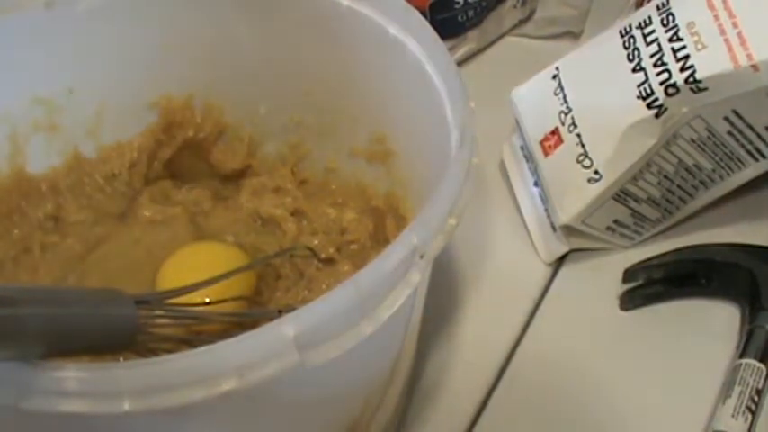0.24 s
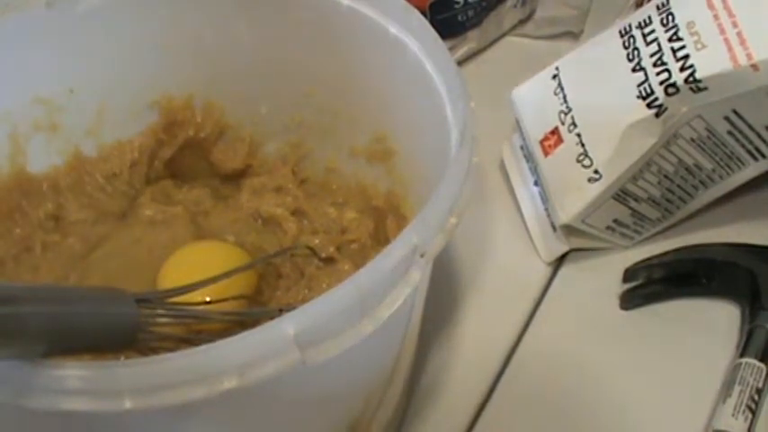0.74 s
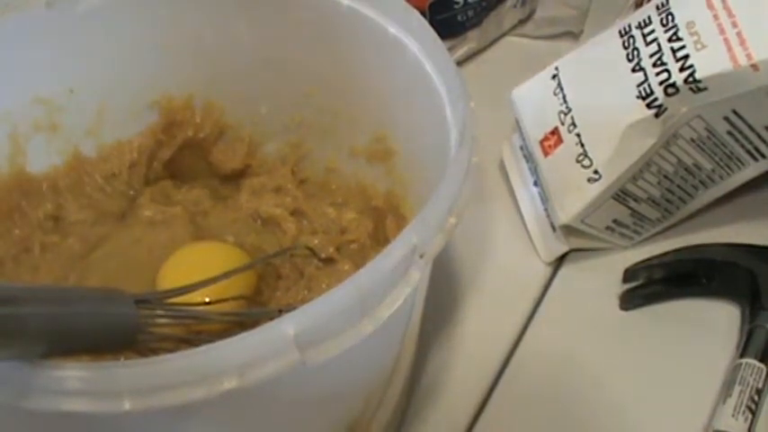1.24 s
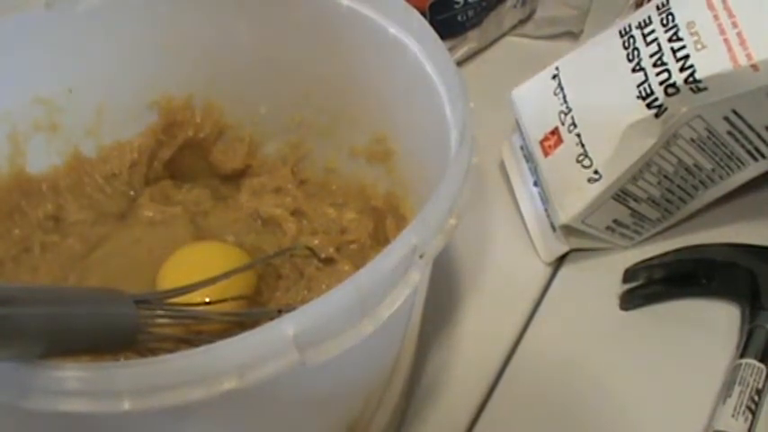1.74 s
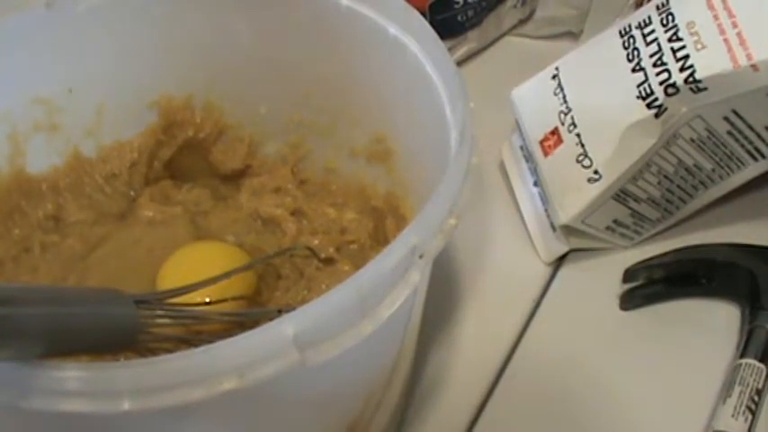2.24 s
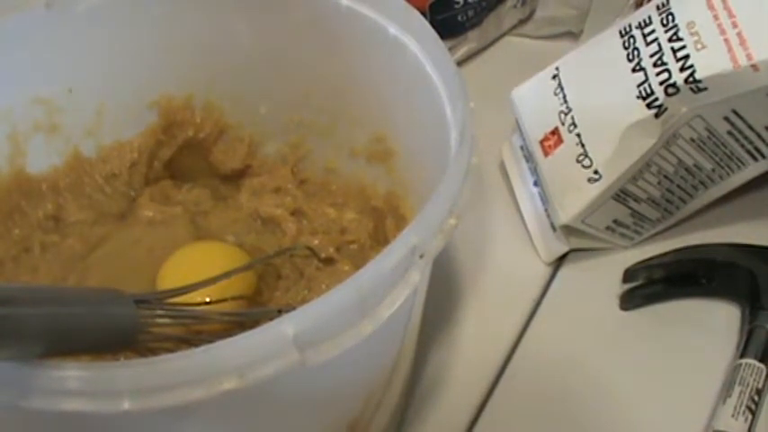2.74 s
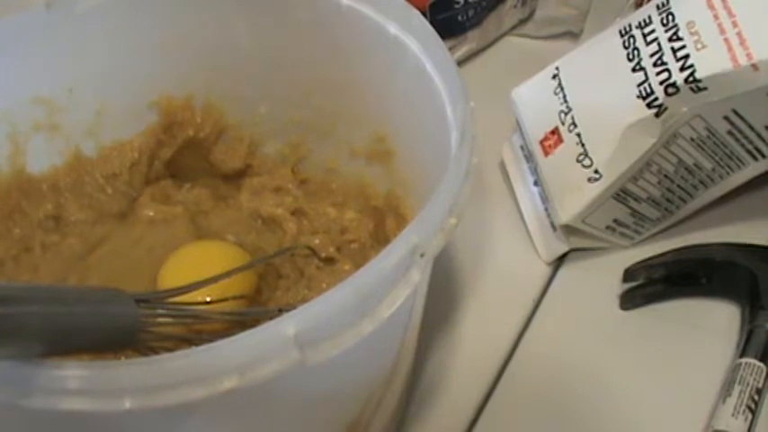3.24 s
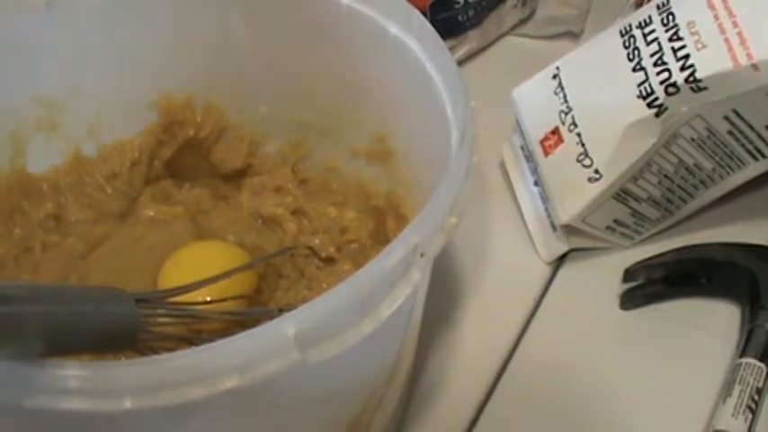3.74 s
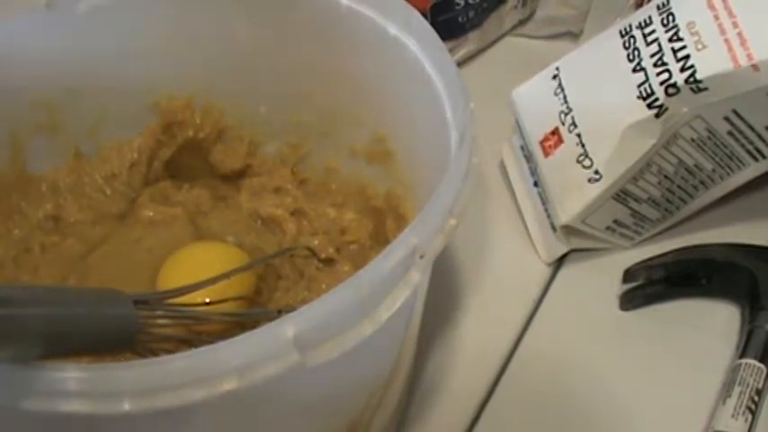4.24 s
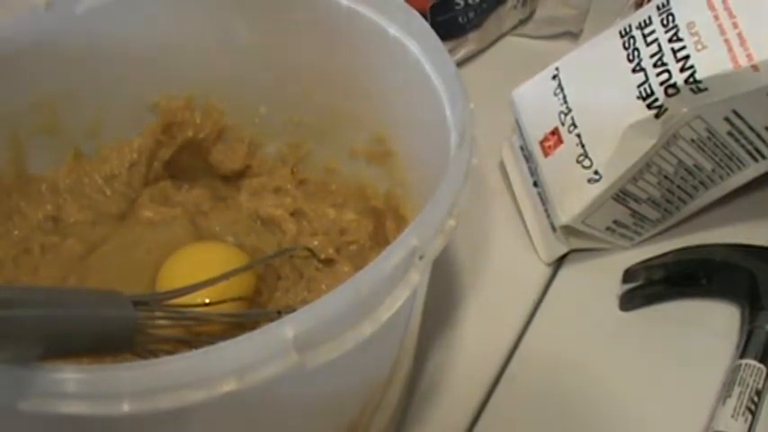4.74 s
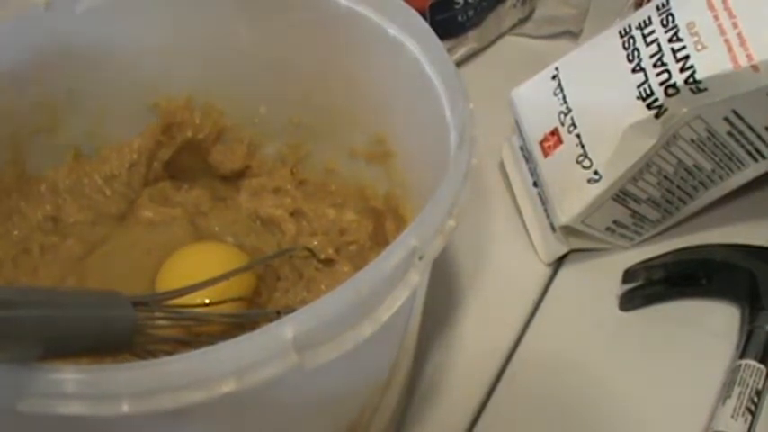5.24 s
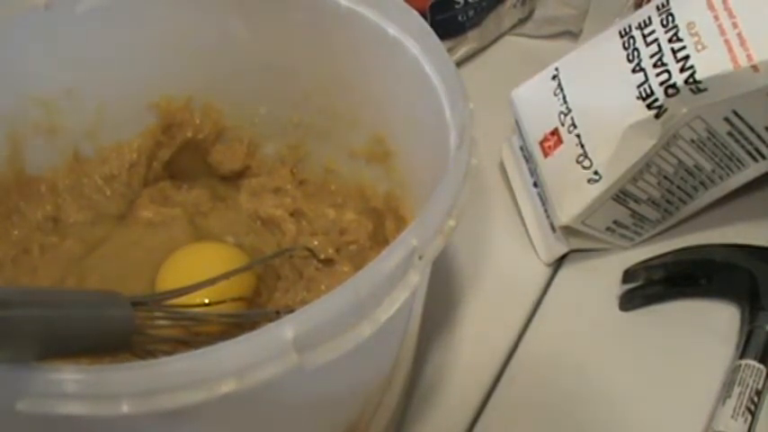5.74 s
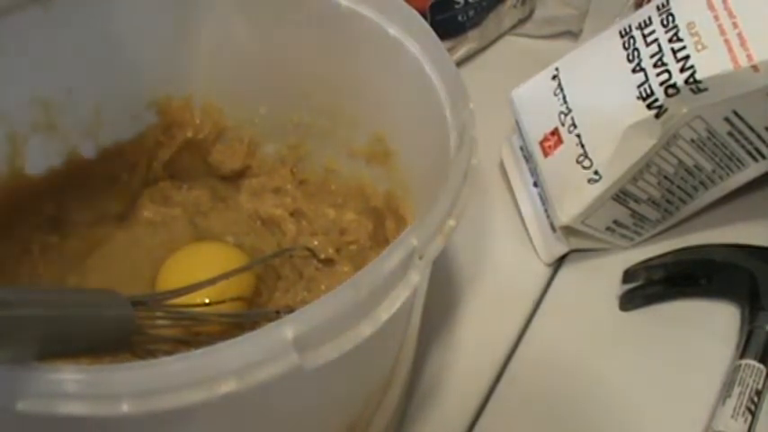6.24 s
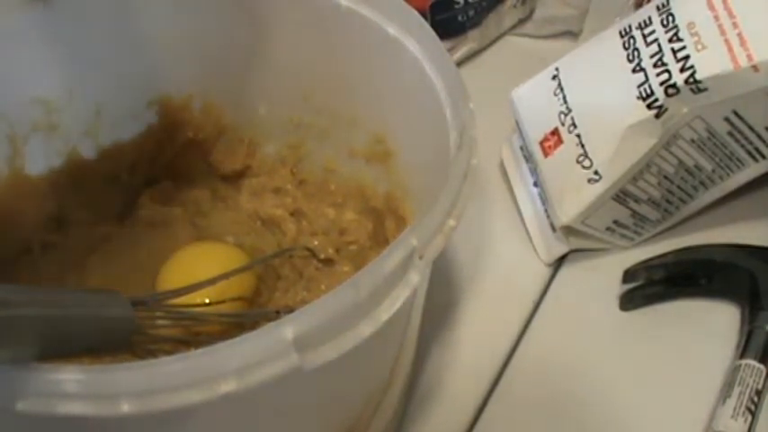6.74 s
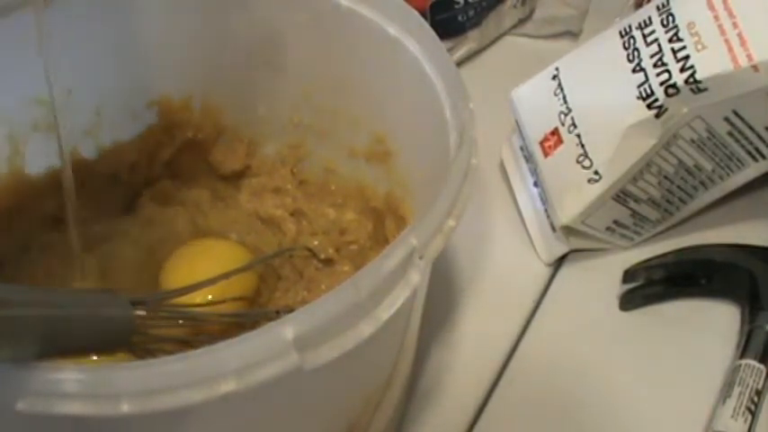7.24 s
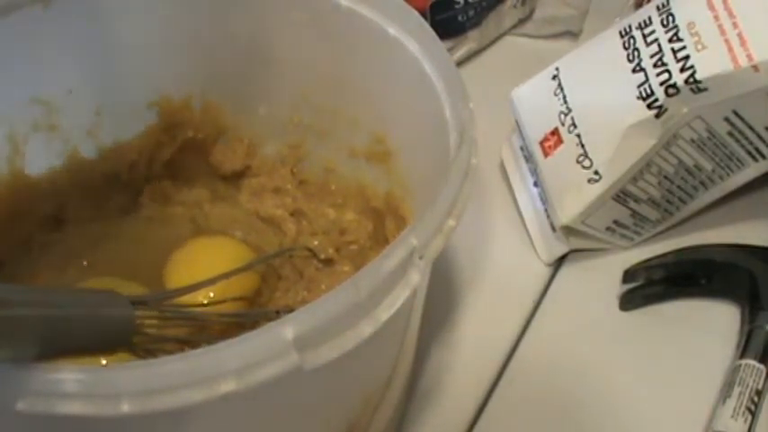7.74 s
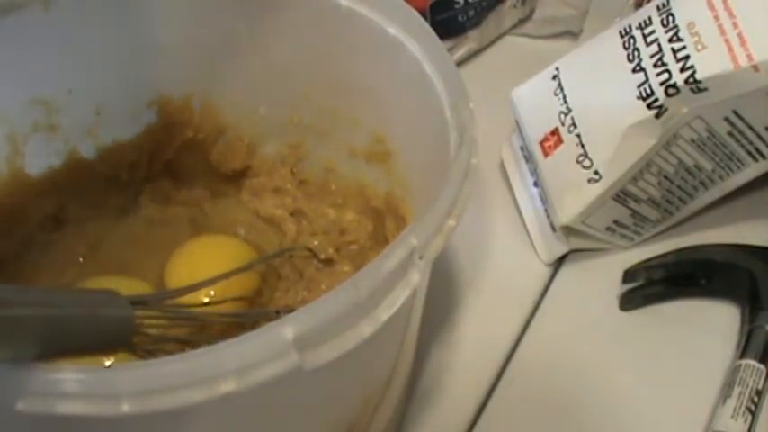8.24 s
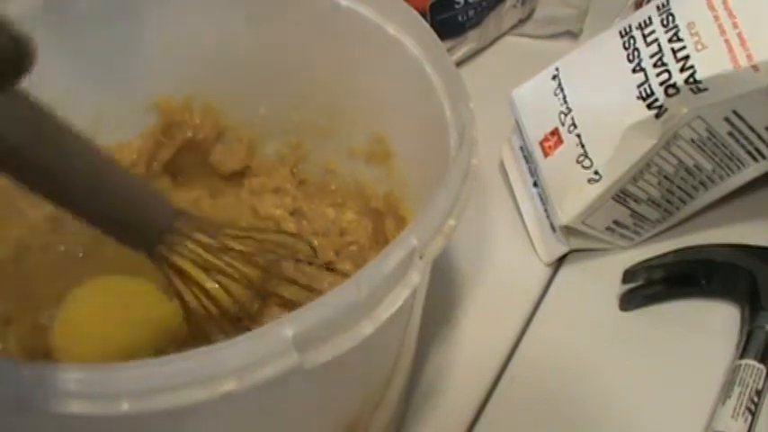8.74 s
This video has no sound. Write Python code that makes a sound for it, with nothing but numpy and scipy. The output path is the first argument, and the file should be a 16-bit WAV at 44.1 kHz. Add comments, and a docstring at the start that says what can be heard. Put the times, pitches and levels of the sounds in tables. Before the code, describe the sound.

Off-screen rummaging and a chattering lid or door clap lead to a crisp egg crack over a plastic bowl, shell crunching and wire whisk taps.

```python
"""Cracking an egg in a quiet kitchen

Out of sight, probably as an egg is fetched, things scrape, click and bump, and something claps shut.
Then, right over a plastic bowl of batter, the shell snaps open, drains with soft plops and is crumpled,
and a wire whisk is lifted. Snaps and scrapes are shaped noise with a resonance; plops and bubbles are
short sine tones. Bowl and room answer most sounds with fading noise, over a steady room murmur.
"""
import sys
import numpy as np
from scipy import signal
from scipy.fft import rfft, irfft
from scipy.io import wavfile

SR = 44100
rng = np.random.default_rng(int(sys.argv[2]) if len(sys.argv) > 2 else 0)


def materialize(psi):
    """Save the field psi as 16-bit PCM at rate SR to the path in sys.argv[1].

    A 1-D psi becomes a single channel; in a 2-D psi each row is a channel.
    """
    bounded = np.clip(np.atleast_2d(psi).T, -1, 1)
    quanta = np.round(bounded * 32767).astype(np.int16)
    wavfile.write(sys.argv[1], SR, quanta)


N = 397295

# Levels in the event tables are relative: each layer is balanced again when it is mixed.
# A t60 is the time a sound takes to fall by 60 dB.

# brittle snaps of the shell: (time [s], level [dB], treble [dB])
SHELL_SNAPS = [(6.1746, -36.5, 3), (6.3367, -36.5, 3), (6.3682, -35, 9), (6.375, -29, 13), (6.386, -18, 4),
               (6.519, -36, 13), (6.5313, -21, 7), (6.536, -18.5, 10), (6.577, -15.5, -1),
               (6.5857, -19.5, 8), (6.6047, -18, 16), (6.6284, -18.5, 7), (6.6969, -26, 6.5),
               (6.757, -27.5, 3), (6.7952, -29, -5), (6.8505, -28.5, 18), (6.8669, -29, -8),
               (6.8846, -30, 8), (6.929, -25.5, -1), (7.0315, -38, 2), (7.1542, -30, -10),
               (7.2316, -38, 3.5), (7.413, -50, -10), (7.9217, -33, -2), (7.9255, -29, -5),
               (7.976, -30.5, 1), (8.0089, -26, -0.5), (8.064, -28.5, -1), (8.0944, -18.5, -4),
               (8.1481, -21.5, 2), (8.1771, -23, -1.5), (8.2096, -28.5, 0), (8.2685, -30.5, 3),
               (8.3027, -28.5, 4.5), (8.3697, -23, 0), (8.4017, -21, 2), (8.4519, -24, -1),
               (8.608, -39.5, 5), (8.681, -36, 15)]
# chips that break free and ring far above the hollow: (time [s], t60 [s], level [dB], pitch [Hz])
SHELL_CHIPS = [(6.4081, 0.036, -21, 6900), (6.716, 0.025, -23, 10500), (6.7385, 0.0054, -17.5, 8100),
               (7.1543, 0.0017, -16.5, 11900), (7.159, 0.0042, -16, 12300)]
# shell crumbling under the thumbs: (time [s], rise [s], t60 [s], level [dB], resonance [Hz])
SHELL_CRUNCHES = [(6.229, 0.034, 0.17, -52, 1000), (6.579, 0.0077, 0.22, -27.5, 1000),
                  (6.691, 0.05, 0.5, -41, 1150), (6.8, 0.06, 0.44, -42.5, 2680),
                  (7.7, 0.15, 0.16, -54, 2580), (7.95, 0.045, 0.3, -43, 2120),
                  (8.094, 0.001, 0.18, -23.5, 3920), (8.14, 0.027, 0.71, -39, 1970),
                  (8.341, 0.041, 0.13, -33.5, 2000), (8.398, 0.028, 0.11, -22.5, 5300),
                  (8.5, 0.15, 2.1, -57, 1860)]
# egg white tearing into tiny bubbles: (start [s], end [s], level [dB])
EGG_WHITE_TEARS = [(6.57, 6.632, -36), (6.695, 6.769, -42), (6.775, 6.873, -30.5), (6.862, 6.944, -31.5),
                   (7.584, 7.921, -45), (8.455, 8.672, -44.5)]
# tone colour of the shell: (frequency [Hz], level [dB])
SHELL_COLOUR = [(60, -13), (250, -7), (500, -2), (900, -0.5), (2500, -1.5), (6000, 0), (11000, -2.5),
                (13000, -7), (16000, -17)]
# faint ticks scattered over this time, and their middle level and range
TICKS_FROM_S, TICKS_TO_S, TICK_DB, TICK_SPREAD_DB = 6.65, 8.7, -44.5, 8
BUBBLE_SPREAD = 2.1  # ratio of the highest to the lowest starting pitch


def eggshell():
    """Brittle shell snaps, chips and crumbles; wet bubbles glide up in pitch as they burst."""
    out = np.zeros(N)
    for s, db, treble_db in SHELL_SNAPS:
        add(out, s, snap(s, db, treble_db))
    for when, strength in rng.random(size=(14, 2)):
        s = TICKS_FROM_S + when * (TICKS_TO_S - TICKS_FROM_S)
        tick_db = TICK_DB + TICK_SPREAD_DB * (strength - .5)
        add(out, s, snap(s, tick_db, treble_db=-10))
    for s, t60, db, hz in SHELL_CHIPS:
        add(out, s, burst(0.00036, t60, db, body_db=-2, treble_db=3, material=SHELL_COLOUR,
                          grain_db=-4.0, hollow_hz=hz, ring_db=9.5))
    for s, rise, t60, db, hz in SHELL_CRUNCHES:
        body_db = hollow(s + rise)[1]
        add(out, s, burst(rise, t60, db, body_db, treble_db=0.0, material=SHELL_COLOUR,
                          grain_db=3.0, hollow_hz=hz, ring_db=4.5))
    for start, end, db in EGG_WHITE_TEARS:
        for when, size, strength in rng.random((20, 3)):
            s = start + when * (end - start)
            hz = hollow(s)[0] * BUBBLE_SPREAD ** (size - .5)
            add(out, s, bubble(hz, db + 3.9 * (strength - 2.0)))
    return undb(1.0) * space(out, bowl_db=-8.5, room_db=-17.5, pan_db=2.4)


def snap(s, db, treble_db):
    """One fracture rings the hollow as it is at that moment."""
    hz, body_db = hollow(s)
    return burst(0.00015, 0.021, db, body_db, treble_db, SHELL_COLOUR,
                 grain_db=1.0, hollow_hz=hz, ring_db=5.5)


# the shell's hollow as it is opened, drained and crushed: (time [s], pitch [Hz], body [dB])
SHELL_OPENING_STAGES = [(6.35, 1020, 4), (6.62, 966, -2.5), (6.71, 1220, -9), (6.79, 2640, -14),
                        (6.94, 1590, -11), (7.15, 1790, 5.5), (7.25, 2440, 0), (7.65, 2750, -4),
                        (8.0, 1990, -10), (8.45, 1960, -15.5)]


def hollow(s):
    """Pitch (Hz) and body (dB) of the shell's hollow at time s."""
    times, hz, body_db = np.transpose(SHELL_OPENING_STAGES)
    return np.interp(s, times, hz), np.interp(s, times, body_db)


def bubble(hz, db):
    """A tiny bubble rings as a short tone that glides up."""
    t = seconds(.03)
    life = 26 / hz  # t60 in seconds: higher bubbles die sooner
    cycles = hz * t * (1 + 0.07 * t / life)
    return undb(db) * envelope(t, 0.00068, life) * np.sin(2 * np.pi * cycles)


# whisk wires tapping the bowl: (time [s], level [dB])
WIRE_TAPS = [(8.8507, -32.5), (8.88, -31), (8.9008, -26), (8.9336, -14.5), (8.9513, -19), (8.974, -9)]
# tone colour of the whisk wire: (frequency [Hz], level [dB])
WIRE_COLOUR = [(60, -8), (250, 1), (550, 7.5), (1200, 2.5), (2500, 0.5), (4200, 3), (6000, -2.5),
               (11000, -4), (16000, -22)]
# the buzz after each tap; its level is relative to the tap
WIRE_BUZZ_LAG_S, WIRE_BUZZ_T60_S, WIRE_BUZZ_DB = 0.0025, 0.062, -13


def whisk():
    """Each wire ticks on the bowl and buzzes briefly, while sticky batter lets go of it."""
    out = np.zeros(N)
    for s, db in WIRE_TAPS:
        add(out, s, burst(0, 0.0038, db, body_db=-9, treble_db=3.0, material=WIRE_COLOUR, grain_db=16.0))
        buzz = burst(0, WIRE_BUZZ_T60_S, db + WIRE_BUZZ_DB, body_db=3.5, treble_db=6.5,
                     material=WIRE_COLOUR, grain_db=5.0)
        add(out, s + WIRE_BUZZ_LAG_S, buzz)
    # the batter letting go
    add(out, 8.88, burst(0.032, 0.58, db=-37.5, body_db=5.5, treble_db=8.5,
                         material=WIRE_COLOUR, grain_db=3.0))
    # the plastic wall answers two taps with a short hollow knock
    t = seconds(.2)
    for s, hz, db in [(8.937, 474, -24), (8.975, 378, -31)]:
        add(out, s, undb(db) * envelope(t, 0.00067, 0.04) * np.sin(2 * np.pi * hz * t))
    return undb(-1.5) * space(out, bowl_db=-15, room_db=-14.0, pan_db=0.5)


# small hard things handled further off: (time [s], level [dB], treble [dB], resonance [Hz])
HARD_CLICKS = [(0.8164, -49, 10, 9000), (1.2133, -37, -1, 5340), (1.7195, -46, 6, 9000),
               (1.8956, -32.5, -10, 3460), (1.973, -34, -7, 3540), (2.9294, -42, 21, 8400),
               (4.6086, -22, -8, 3230), (4.639, -18.5, -0.5, 6240), (4.9543, -39, 3, 4950),
               (5.2651, -19, -11, 2250), (5.2686, -15.5, 8, 3740)]
# dull bumps further off: (time [s], t60 [s], level [dB], resonance [Hz])
DULL_BUMPS = [(0.224, 0.046, -50, 490), (1.062, 0.11, -32, 1240), (4.037, 0.049, -31, 690),
              (4.451, 0.14, -41.5, 476), (4.864, 0.057, -37.5, 620)]
# things pushed a short way that slide to rest:
# (time [s], t60 [s], level [dB], treble [dB], resonance [Hz])
SHORT_SCRAPES = [(1.211, 0.37, -46.5, 0.5, 890), (1.265, 0.14, -47.5, 1, 805),
                 (1.311, 0.11, -45, -3.5, 962), (1.56, 0.23, -51.5, -2, 2420), (2.068, 0.2, -37, 8.5, 1380),
                 (2.146, 0.11, -36.5, 5.5, 2600), (2.175, 0.4, -38, 0, 1730), (2.224, 0.13, -29, -2, 1850),
                 (2.36, 0.78, -53.5, 4, 1490), (2.627, 0.61, -56.5, 3, 2160),
                 (5.266, 0.21, -33.5, 0.5, 1870)]
# a faint high hiss before the rummaging: (time [s], level [dB])
FAINT_HISS = [(2.89, -58.5), (2.96, -59), (3.3, -59.5), (3.6, -62.5), (4.0, -63)]
# tone colour of the handled things: (frequency [Hz], level [dB])
HANDLING_COLOUR = [(40, -8.5), (150, -4), (400, 0), (900, 2), (2500, 2), (6000, 0.5), (11000, 0),
                   (13000, -9), (16000, -20)]


def handling():
    """Clicks, bumps, scrapes and rummaging across the kitchen, with much of the room in them."""
    clicks, scrapes = np.zeros(N), np.zeros(N)
    for s, db, treble_db, hz in HARD_CLICKS:
        add(clicks, s, burst(0, 0.011, db, body_db=-4, treble_db=treble_db, material=HANDLING_COLOUR,
                             grain_db=6.5, hollow_hz=hz, ring_db=2))
    for s, t60, db, hz in DULL_BUMPS:
        add(scrapes, s, knock(t60, db, hz))
    for s, t60, db, treble_db, hz in SHORT_SCRAPES:
        add(scrapes, s, burst(0.0076, t60, db, body_db=-1.0, treble_db=treble_db,
                              material=HANDLING_COLOUR, grain_db=3.0, hollow_hz=hz, ring_db=6))
    scrapes += rummage()
    scrapes += rub(FAINT_HISS, db=-0.5, body_db=5, treble_db=0.0, grain_db=2,
                   hollow_hz=10400, ring_db=-3.0)
    near_clicks = undb(4.0) * space(clicks, bowl_db=-2, room_db=-7.5, pan_db=2.0)
    return near_clicks + undb(3.5) * space(scrapes, bowl_db=-12.5, room_db=-9.5, pan_db=1.4)


def knock(t60, db, hz):
    """A dull, well damped bump that thins out below and above its resonance."""
    body_db = 16.5 - 7.5 * np.log2(hz / 500)  # higher bumps have less body, by 7.5 dB an octave
    x = burst(0.0046, t60, db, body_db, treble_db=0.5, material=HANDLING_COLOUR,
              grain_db=3.0, hollow_hz=hz, ring_db=3.5)
    band = signal.butter(2, [0.14 * hz, 2.7 * hz], "band", fs=SR, output="sos")
    return signal.sosfilt(band, x)


# rummaging in two long strokes: (time [s], level of the dull rub [dB], level of the rustle [dB])
RUMMAGE_STROKES = [
    [(4.02, -56, -56), (4.04, -37, -38), (4.1, -52.5, -45), (4.164, -38, -35), (4.246, -32, -43),
     (4.298, -46, -51), (4.39, -43.5, -44.5), (4.48, -54.5, -82), (4.514, -55.5, -56), (4.6, -50, -45)],
    [(4.66, -37.5, -52), (4.734, -51.5, -68), (4.76, -40, -45), (4.862, -59, -51.5), (4.868, -64, -50),
     (4.92, -53, -62.5), (5.098, -41, -43.5), (5.146, -53.5, -56), (5.204, -40, -65), (5.25, -53.5, -38)],
]


def rummage():
    """A dull rubbing with a brighter rustle on top of it."""
    times, body, treble = np.vstack(RUMMAGE_STROKES).T
    dull = rub(np.c_[times, body], db=-3.5, body_db=4.5, treble_db=-10, grain_db=4,
               hollow_hz=833, ring_db=-11)
    return dull + rub(np.c_[times, treble], db=-5.0, body_db=-8, treble_db=0.5, grain_db=2)


CATCHES_PER_S, CATCH_DB = 70, 2.2  # how often a rub catches, and how unevenly


def rub(curve, db, body_db, treble_db, grain_db, hollow_hz=0, ring_db=0):
    """A handled thing follows a (time, level) curve, catching and slipping unevenly on the way."""
    times, levels = np.transpose(curve)
    t = seconds(times[-1] - times[0])
    catches = rng.standard_normal(int(t[-1] * CATCHES_PER_S) + 2)
    uneven_db = CATCH_DB * np.interp(t * CATCHES_PER_S, np.arange(len(catches)), catches)
    shape = undb(db + uneven_db + np.interp(times[0] + t, times, levels))
    out = np.zeros(N)
    add(out, times[0], grains(shape, body_db, treble_db, HANDLING_COLOUR, grain_db, hollow_hz, ring_db))
    return out


# a lid or door claps shut and chatters: (time [s], level [dB])
CLAP_BLOWS = [(5.6199, 6), (5.628, 3), (5.639, 2.5), (5.649, -4), (5.662, -1), (5.671, -11), (5.678, -16)]
# its clearest ringing tones: (frequency [Hz], level [dB])
CLAP_TONES = [(576.0, -53), (764.4, -39.5), (909.8, -50), (1039, -52), (1130, -40.5), (1384, -52),
              (1626, -40.5), (1712, -42), (1793, -53), (1976, -53), (2336, -65), (2406, -71), (2552, -82),
              (2735, -47.5), (2853, -47), (2961, -38), (3074, -41), (3235, -54), (3289, -64), (3418, -55),
              (3531, -97), (3903, -42), (4043, -63), (4091, -54), (4382, -48), (4441, -44), (4640, -59),
              (4840, -52), (8651, -57), (8829, -56)]
# tone colour of each blow: (frequency [Hz], level [dB])
CLAP_BLOW_COLOUR = [(30, -19), (70, -18.5), (150, -10), (260, -13.5), (450, -4), (750, -13), (1050, -7.5),
                    (1350, -0.5), (1800, 0), (2400, -3), (3200, -4.5), (4500, -6), (5500, -12.5),
                    (8800, -5.5), (16000, -20)]
# how long the panel rings: (frequency [Hz], t60 [s])
CLAP_DECAY = [(100, 0.82), (400, 0.63), (1000, 0.34), (3000, 0.21), (4500, 0.25), (6000, 0.16),
              (14000, 0.076)]


def clap():
    """A few quick blows shake the panel's dense modes; its clearest modes build up and ring on."""
    t, out = seconds(1), np.zeros(N)
    for s, db in CLAP_BLOWS:
        blow = unit(colour(dense_ring(CLAP_DECAY), CLAP_BLOW_COLOUR))
        add(out, s, undb(db + 8.0) * blow)
    modes = np.zeros(len(t))
    for hz, db in CLAP_TONES:
        fade = unit(envelope(t, .022, .95 * lookup(CLAP_DECAY, hz)))
        modes += undb(db) * fade * np.sin(2 * np.pi * (hz * t + rng.random()))
    add(out, CLAP_BLOWS[0][0], undb(13) * unit(modes))
    return space(out, bowl_db=-5.5, room_db=-15, pan_db=-0.4)


# soft hollow plops: (time [s], pitch [Hz], level [dB], t60 [s])
SOFT_PLOPS = [(0.778, 353, -51, 0.075), (1.077, 491, -25, 0.053), (1.118, 570, -40, 0.027),
              (2.755, 352, -46, 0.062), (3.331, 496, -39.5, 0.066), (6.044, 387, -34, 0.022),
              (7.095, 374, -38.5, 0.023), (7.155, 467, -32, 0.022), (7.429, 384, -34, 0.023),
              (8.145, 322, -42, 0.02), (8.474, 375, -36.5, 0.026)]
PLOP_RISE_SHARE = 0.26  # swelling time as a share of the t60


def plops():
    """Small pockets of air swell and ring for a few cycles."""
    t, out = seconds(.5), np.zeros(N)
    for s, hz, db, t60 in SOFT_PLOPS:
        add(out, s, undb(db) * envelope(t, PLOP_RISE_SHARE * t60, t60) * np.sin(2 * np.pi * hz * t))
    return space(out, bowl_db=-17, room_db=-16, pan_db=0)


# dull thuds through floor and counter: (time [s], pitch [Hz], level [dB], t60 [s])
DULL_THUDS = [(0.306, 30.5, -54, 0.97), (3.145, 42.6, -44, 0.85), (3.75, 38.6, -36.5, 0.53),
              (4.04, 86.5, -34, 0.34), (4.25, 82.7, -49.5, 0.82), (4.631, 80.7, -47.5, 1),
              (4.999, 86.3, -59, 0.99), (5.622, 81, -25.5, 0.16), (7.153, 47.7, -55.5, 0.61)]


def thuds():
    """The counter sways at a low pitch, with a little rumble around it."""
    t, out = seconds(0.47), np.zeros(N)
    rumble_colour = [(25, -22), (70, -3), (130, -12.5), (400, -19.5), (1200, -28.5), (4000, -43.0)]
    for s, hz, db, t60 in DULL_THUDS:
        rumble = colour(rng.standard_normal(len(t)), rumble_colour)
        sway = np.sin(2 * np.pi * hz * t)
        add(out, s, undb(db) * envelope(t, 0.0086, t60) * (sway + 0.44 * rumble / rumble.std()))
    return out


# tone colour of the room's murmur: (frequency [Hz], level [dB])
MURMUR_COLOUR = [(25, -5), (60, -3.5), (200, 0), (350, -1), (600, -5), (1200, -8.5), (2500, -10),
                 (5000, -12.5), (8000, -13), (11000, -11.5), (13500, -14.5), (16000, -14.5)]
MURMUR_DB = -57.2  # the part shared by both ears


def quiet():
    """Steady noise: a low room murmur much alike in both ears, under a wider hiss."""
    mid, side = (colour(rng.standard_normal(N), MURMUR_COLOUR, size=8192) for _ in range(2))
    side = colour(side, [(60, -18), (300, -4.5), (1500, 1), (8000, -3.5)])
    return undb(MURMUR_DB) / mid.std() * np.array([mid + side, mid - side])


# how long the bowl and counter answer: (frequency [Hz], t60 [s])
BOWL_DECAY = [(200, 0.051), (1500, 0.19), (5000, 0.079), (15000, 0.095)]
# how long the room answers: (frequency [Hz], t60 [s])
ROOM_DECAY = [(100, 0.93), (500, 0.28), (2000, 0.23), (8000, 0.21), (15000, 0.24)]


def space(x, bowl_db, room_db, pan_db):
    """Direct sound, quick reflections from bowl and counter, then the room; wider towards the treble."""
    def echoes():
        """Bowl and room answers, each swelling quickly and then fading."""
        near = dense_ring(BOWL_DECAY) * np.minimum(seconds(1) / 0.00054, 1)
        far = dense_ring(ROOM_DECAY) * np.minimum(seconds(1) / 0.017, 1)
        return undb(bowl_db) * unit(near) + undb(room_db) * unit(far)
    mid = echoes()
    mid[0] += 1  # the direct sound
    # a very short scatter makes the two ears differ a little
    scatter = undb(-15) * unit(rng.standard_normal(len(mid)) * envelope(seconds(1), 0, 0.011))
    side = colour(echoes() + scatter, [(60, -18), (300, -12.5), (1500, -5), (5000, -1), (12000, 2.5)])
    ears = [undb(pan_db / 2) * (mid + side), undb(-pan_db / 2) * (mid - side)]
    return np.array([signal.fftconvolve(x, ear)[:N] for ear in ears]) / np.sqrt(np.sum(mid ** 2))


def dense_ring(t60s, count=16):
    """Countless overlapping modes: noise whose bands each die at their own rate."""
    t = seconds(1)
    noise, f = rfft(rng.standard_normal(len(t))), np.fft.rfftfreq(len(t), 1 / SR)
    centres = np.geomspace(60, 16000, count)
    ring = np.zeros(len(t))
    for hz, band in zip(centres, np.eye(count)):
        band_noise = irfft(noise * lookup(np.c_[centres, band], f), len(t))
        ring += band_noise * envelope(t, 0, lookup(t60s, hz))
    return ring


def burst(rise, t60, db, body_db, treble_db, material, grain_db, hollow_hz=0, ring_db=0):
    """Grains that swell and die away."""
    shape = envelope(seconds(rise + t60 + .02), rise, t60)
    return undb(db) * grains(shape, body_db, treble_db, material, grain_db, hollow_hz, ring_db)


def grains(shape, body_db, treble_db, material, grain_db, hollow_hz, ring_db):
    """Tiny fractures or slips of uneven size, coloured by the material and its resonance."""
    # each grain keeps its random size for 20 samples
    steps = np.repeat(rng.standard_normal(len(shape) // 20 + 1), 20)[:len(shape)]
    sizes = undb(grain_db * np.clip(steps, -2, 2))
    x = shape * sizes * rng.standard_normal(len(shape))
    if hollow_hz:
        # a main resonance and a weaker overtone
        main = signal.lfilter(*signal.iirpeak(hollow_hz, 6.0, SR), x)
        overtone_hz = min(1.765 * hollow_hz, SR / 2 - 1000)
        overtone = signal.lfilter(*signal.iirpeak(overtone_hz, 12.0, SR), x)
        x = x + undb(ring_db) * (main + .5 * overtone)
    x = colour(x, material)
    x = colour(x, [(800, body_db), (1800, 0.0047), (3800, 0), (8000, treble_db)])
    return unit(x) * np.sqrt(np.sum(shape ** 2))


def envelope(t, rise, t60):
    """Straight rise, then exponential decay by 60 dB in t60 seconds."""
    swell = np.minimum((t + 1 / SR) / max(rise, 1 / SR), 1)
    return swell * np.exp(-np.log(1000) * np.maximum(t - rise, 0) / t60)


def colour(x, points, size=2048):
    """Filter that reacts only after its input, with the given (Hz, dB) response."""
    cepstrum = irfft(np.log(undb(lookup(points, np.fft.rfftfreq(size, 1 / SR)))))
    # folding the cepstrum forward gives minimum phase: no sound before the cause
    cepstrum[1:size // 2] *= 2
    cepstrum[size // 2 + 1:] = 0
    return signal.fftconvolve(x, irfft(np.exp(rfft(cepstrum))))[:len(x)]


def lookup(points, hz):
    """Read (Hz, value) points on a log-frequency axis."""
    f, value = np.transpose(points)
    return np.interp(np.log(np.maximum(hz, 1)), np.log(f), value)


def undb(db):
    """Decibels to gain."""
    return 10 ** (np.asarray(db) / 20)


def seconds(length):
    """Time axis of the given length."""
    return np.arange(int(length * SR)) / SR


def unit(x):
    """Scale to an energy of one."""
    return x / np.sqrt(np.sum(x ** 2))


def add(track, s, sound):
    """Mix a sound into a track at time s."""
    i = int(s * SR)
    track[i:i + len(sound)] += sound[:len(track) - i]


def scene():
    """Everything in the kitchen."""
    return eggshell() + whisk() + handling() + clap() + plops() + thuds() + quiet()


def record(dry):
    """Cut the deepest bass gently and the very top steeply."""
    dry = signal.sosfilt(signal.butter(2, 28, "high", fs=SR, output="sos"), dry)
    return signal.sosfilt(signal.ellip(10, .2, 70, 15850, fs=SR, output="sos"), dry)


dry = scene()
out = record(dry)
materialize(out)
```